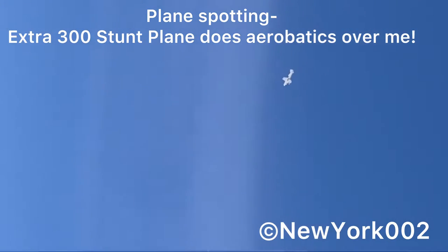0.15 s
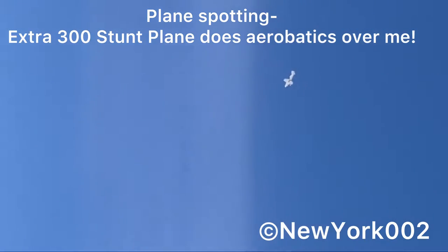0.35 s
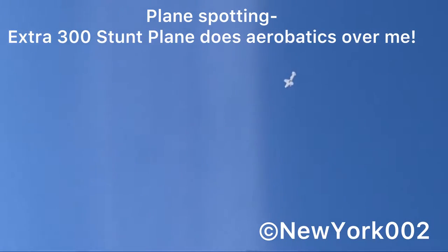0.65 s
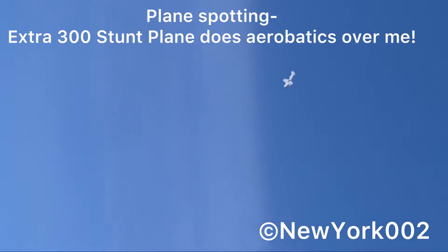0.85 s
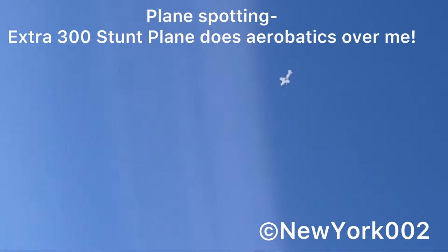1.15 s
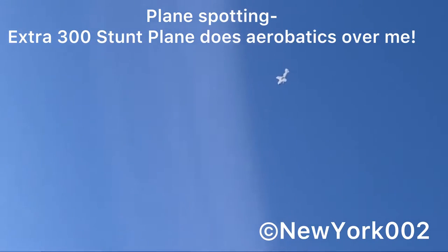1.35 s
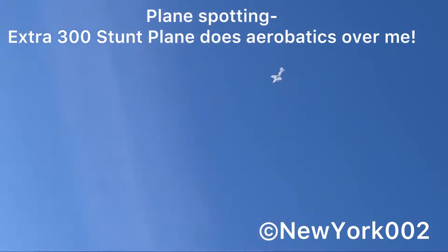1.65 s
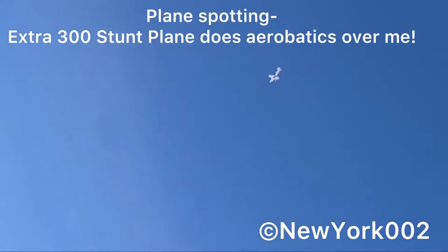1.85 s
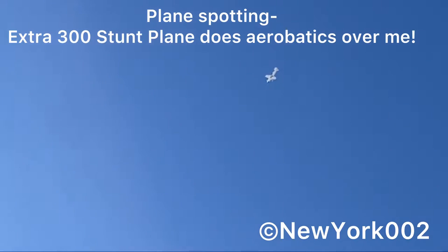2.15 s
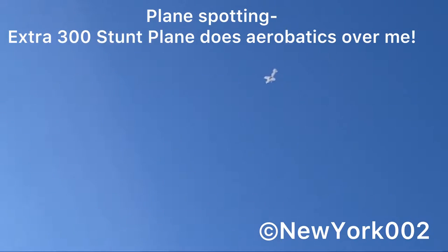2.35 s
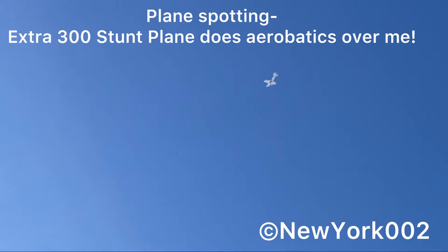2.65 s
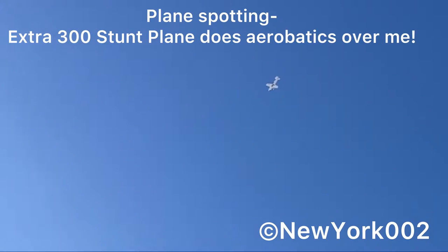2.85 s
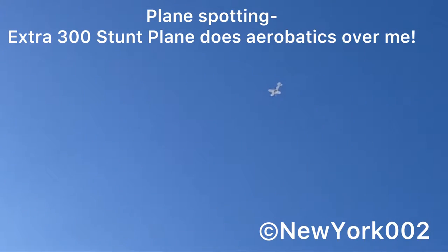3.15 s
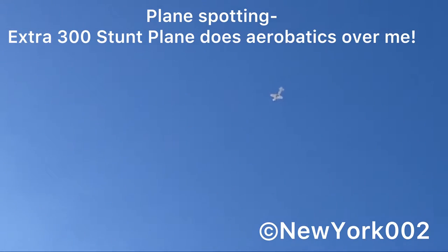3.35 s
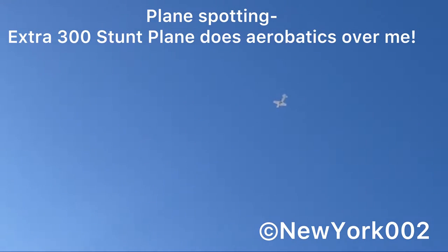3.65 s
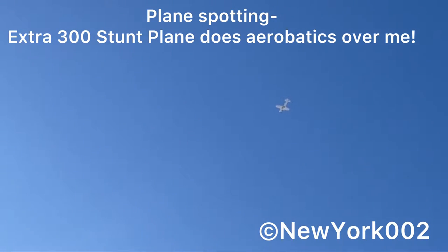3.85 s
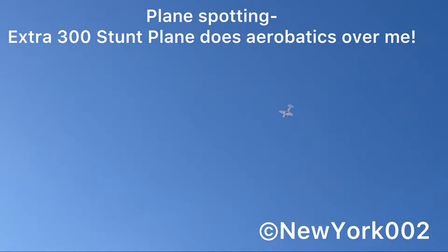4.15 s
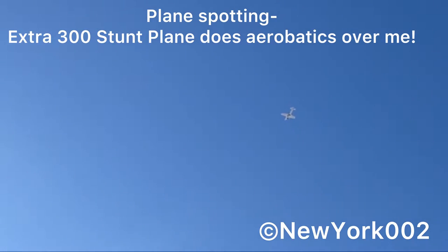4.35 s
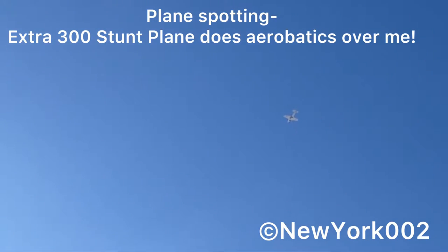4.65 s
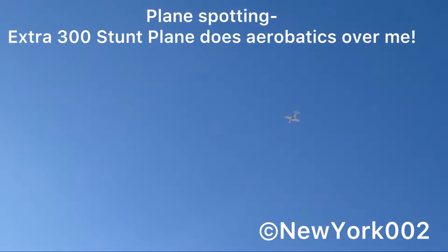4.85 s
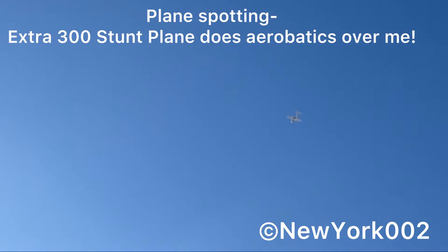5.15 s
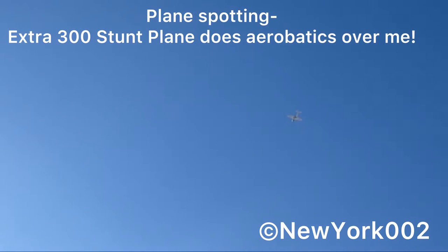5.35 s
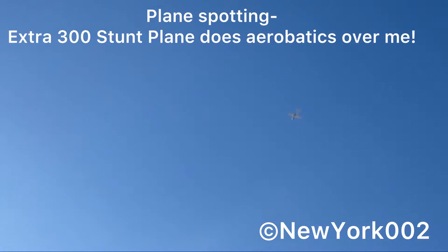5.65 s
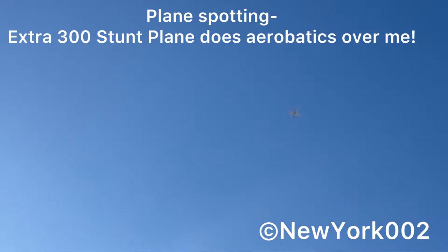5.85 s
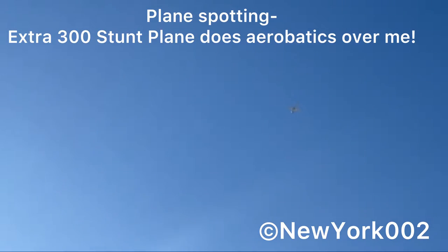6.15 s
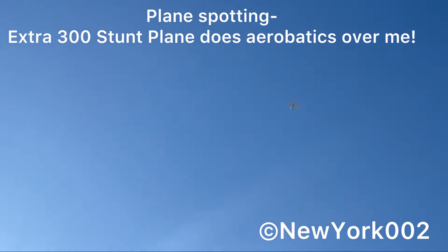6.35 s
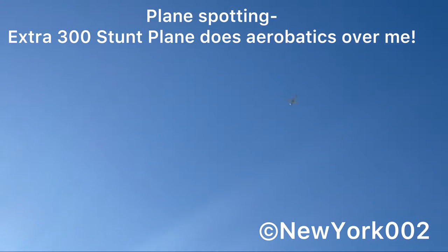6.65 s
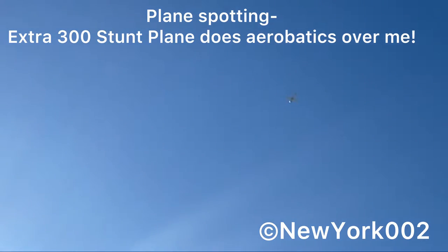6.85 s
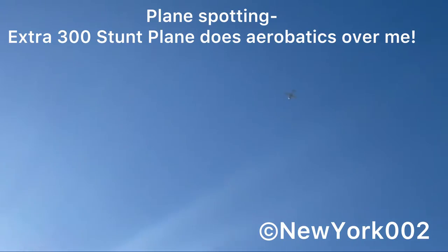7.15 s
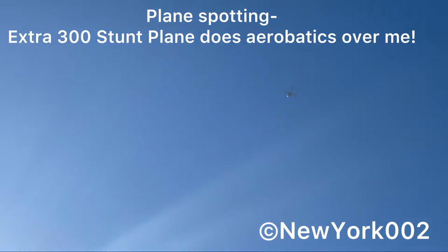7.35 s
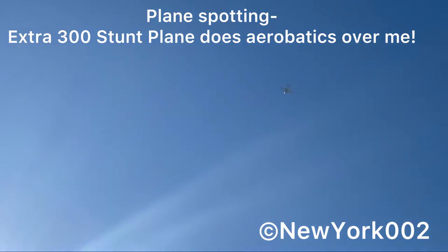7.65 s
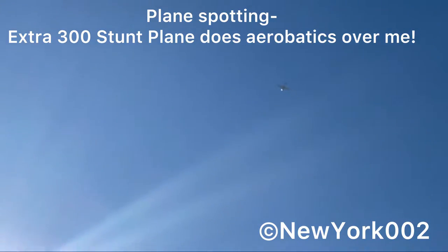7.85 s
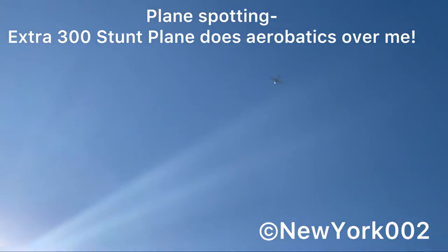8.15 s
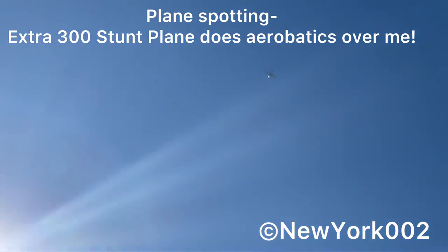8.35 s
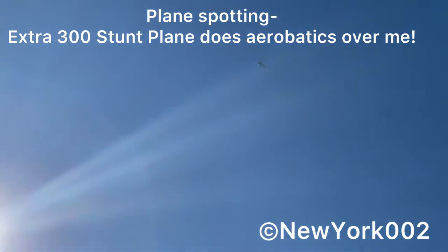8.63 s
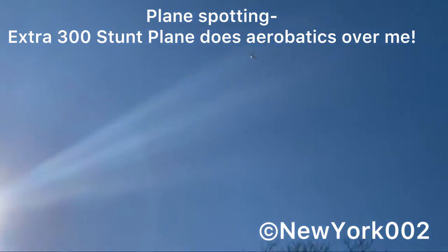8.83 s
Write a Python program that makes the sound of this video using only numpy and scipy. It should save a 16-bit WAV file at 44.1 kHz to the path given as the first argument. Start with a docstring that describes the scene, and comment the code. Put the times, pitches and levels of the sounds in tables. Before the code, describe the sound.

Wind thumps and rumbles on the microphone under the rasping, surging drone of a stunt plane climbing away.

```python
"""A six-cylinder aerobatic plane climbs away high overhead, heard from the ground in the open air.
Its firings make a slowly sinking drone whose harmonics swell and fade in the moving air; the uneven
cylinders lope, and the cracks and puffs of the exhaust come down in rasping surges.
Gusts buffet the stereo microphone, mostly in the first half. Tiny drip-like ticks and one brief
twitter sound over a faint outdoor hiss."""
import sys
import numpy as np
from scipy import signal
from scipy.fft import rfft, irfft, next_fast_len
from scipy.io import wavfile

SR = 44100
rng = np.random.default_rng(int(sys.argv[2]) if len(sys.argv) > 2 else 0)


def int16_out(signal):
    """Quantize to a 16-bit WAV file."""
    q = np.round(np.clip(np.atleast_2d(signal).T, -1, 1) * 32767)
    wavfile.write(sys.argv[1], SR, q.astype(np.int16))


N = 396459
CYLINDERS = 6


def plane(loud_cylinder=5, bark_above_db=8, edge_below_db=11, edge_surge_share=0.95):
    """The plane, far overhead: drone, lope and rasp follow one crankshaft and share the same surges."""
    # Each row: time in seconds, firings per second.
    firing_rate = [(0.0, 117.43), (0.6, 116.84), (1.5, 115.83), (1.8, 115.16), (2.4, 113.71), (3.0, 113.24),
                   (3.3, 112.15), (3.6, 111.89), (4.2, 110.34), (4.79, 109.48), (5.39, 109.47),
                   (5.99, 108.23), (6.59, 106.83), (7.49, 105.32), (7.79, 104.43), (8.39, 104.03),
                   (8.99, 103.37)]
    # Each row: time in seconds, then base levels in dB of the rasp, the bank lines and the cycle lines.
    exhaust_levels = [(0, -59, -46, -56.5), (1.1, -63, -45, -55), (2.5, -55.5, -45, -46.5),
                      (3.5, -55.5, -46, -48), (4.4, -59, -50, -46), (5.3, -55.5, -46, -45.5),
                      (5.9, -60.5, -44.5, -43.5), (6.35, -59.5, -47, -49), (6.75, -62, -45, -44.5),
                      (7.05, -59, -44.5, -43), (7.4, -59, -45.5, -41.5), (8.3, -60.5, -52, -47.5),
                      (8.99, -59, -50.5, -44.5)]
    # Each row: time in seconds, view of the plane (-1 early in the climb, 0 from below, 1 from behind).
    viewpoint = [(1.0, -1), (1.8, -.4), (2.6, -0.21), (3.8, 0.1), (5.2, 0.74), (6.6, 0.94)]
    # Each row: time in seconds, left minus right level in dB.
    pan = [(0, -.3), (1, -1.1), (2.5, -.4), (3.8, -.3), (5, -1.3), (6.6, -1.8), (9, -1.4)]
    firings = np.cumsum(in_time(firing_rate)[0]) / SR - loud_cylinder
    rasp_db, bank_db, cycle_db = in_time(exhaust_levels)
    tail_on, = in_time(viewpoint)
    lift_db, bright_db = surges()
    tones = drone(firings, harmonic_levels(lift_db)) + lope(firings, bank_db, cycle_db, tail_on, lift_db)
    body_db = rasp_db + lift_db
    bark_db = body_db + bark_above_db - bright_db
    edge_db = rasp_db - edge_below_db + edge_surge_share * lift_db + bright_db
    exhaust = rasp(firings, bark_db, body_db, edge_db, crack_db=-5.5 - 0.5 * tail_on)
    return hollow(tones + exhaust) * from_db(in_time(pan)[0] * [[.5], [-.5]])


def drone(firings, levels_db, shimmer_db=0.43, smear_rad=0.07):
    """Exhaust and propeller harmonics line up in one dip per firing; turbulence shakes high ones more."""
    out = 0
    for k, level_db in enumerate(levels_db, 1):
        gain = from_db(level_db + shimmer_db * k * drift(4.1))
        out = out - gain * np.cos(k * (2 * np.pi * firings + smear_rad * drift(4.4)))
    return out


def harmonic_levels(lift_db):
    """The three lowest harmonics fade each in its own way; the next three surge and dull with distance."""
    # Each row of these four: time in seconds, level in dB.
    first = [(0, -58), (.25, -34.5), (.68, -15.5), (2.35, -18.5), (3.05, -16.5), (4.4, -23), (5.08, -16),
             (5.55, -16.5), (6.25, -21), (7.4, -19), (7.7, -21.5), (8.55, -24), (8.99, -25.5)]
    second = [(.3, -36), (.8, -24.5), (1.35, -30.5), (2.6, -27.5), (3.5, -24), (4.399, -28), (5.7, -27),
              (6.9, -38.5), (7.4, -31), (7.8, -39), (8.99, -36)]
    third = [(0, -37.5), (1.301, -35.5), (1.75, -24.5), (2.1, -30), (2.32, -48.5), (2.561, -31.5),
             (2.85, -29), (3.601, -32), (3.899, -38), (4.7, -38.5), (5.1, -31.5), (6.0, -29), (6.33, -37.5),
             (6.701, -33.5), (6.9, -37), (7.1, -25.5), (7.45, -23), (7.748, -30), (8.99, -28.5)]
    upper_base = [(0, -41.5), (2.698, -42), (3.6, -60.5), (5.0, -37), (5.85, -43.5), (6.349, -52),
                  (7.0, -47.5), (7.4, -41), (8.99, -36)]
    # Harmonics 4 to 6. Each row: offset in dB, dB lost per second, share of a surge's lift.
    upper_harmonics = [(-0.5, 0.1, 0.84), (0, 2, 0.47), (-7, 2.3, 0.49)]
    *lows_db, base_db = [in_time(curve)[0] for curve in (first, second, third, upper_base)]
    seconds = np.arange(N) / SR
    uppers_db = [base_db + db - loss * seconds + share * lift_db for db, loss, share in upper_harmonics]
    return lows_db + uppers_db


def lope(firings, bank_db, cycle_db, tail_on, lift_db, surge_share=0.29, shimmer_db=2, centre=20):
    """The two banks differ and one cylinder barks louder; from behind, their lines gather into a throb."""
    # Each row: multiple of the six-firing cycle, then its offset in dB early, from below and from behind.
    lines = [(8, 9, 5, -.5), (9, 5.5, 2, 8.5), (10, 11, -0.5, -7.5), (11, 0, -3, -5.5), (13, 3, -4.5, -7),
             (14, 9, -5, 7), (15, 2.5, 3.5, -1), (16, 3, 0, -4), (17, -1.5, -4.5, -0.5), (19, 3, 0.5, 8.5),
             (20, 7, 0, -1), (21, 4.5, -0.5, 2.5), (22, -2.5, -6.5, -4.5), (23, -4, 10.5, 2.5),
             (25, -8.5, 4.5, 0.5), (26, -4, -2, -8), (27, -7.5, 3.5, -3.5), (28, -1.5, -8.5, -12),
             (29, 0.5, 2, -4.5), (31, -9, -0.5, -6.5), (32, -6, -3.5, -8.5), (33, -18.5, -17, -16),
             (34, -6.5, -10.5, -16.5), (35, -10, -9, -17.5), (37, -12, -9, -12), (38, -15, -11.5, -15),
             (39, -21, -13.5, -12.5), (40, -10, -11.5, -17.5), (41, -8.5, -13, -21.5),
             (42, -16, -12.5, -12.5), (43, -9.5, -13.5, -16.5), (44, -11, -4.5, -18.5),
             (45, -25, -16.5, -23), (46, -14, -13, -22.5), (48, -21, -20, -18), (50, -13.5, -10.5, -14),
             (54, -28.5, -20.5, -20), (56, -17, -16, -20)]
    # How far the lines are out of step. Each row: time in seconds, scale of the scatter in radians.
    phase_scatter = [(0, 2.4), (4.6, 2.4), (5.6, 1.7), (6.1, 1.8), (6.5, 2.2), (7.0, 2.2), (7.4, 2),
                     (8, 1.6), (9, 1.6)]
    out, scatter = 0, in_time(phase_scatter)[0]
    early, behind = np.clip(-tail_on, 0, 1), np.clip(tail_on, 0, 1)
    blur_rad = .13 + .2 * behind   # the air makes the lines wander, the high ones most
    for order, early_db, below_db, behind_db in lines:
        family_db = bank_db if order % (CYLINDERS / 2) == 0 else cycle_db
        angle_db = below_db + (early_db - below_db) * early + (behind_db - below_db) * behind
        air_db = surge_share * order / centre * lift_db + shimmer_db * drift(3)
        sweep = 0.0153 * (order - centre) ** 2   # spreads each throb out in time
        lead = sweep + scatter * rng.uniform(-1.31, 1) + blur_rad * order / centre * drift(5.4)
        phase = 2 * np.pi * order / CYLINDERS * firings + lead
        out = out - from_db(family_db + angle_db + air_db) * np.cos(phase)
    return out


def rasp(firings, bark_db, body_db, edge_db, crack_db, sharpness=0.255, flicker_db=1.16):
    """Each firing lets a sharp crack and a puff of fresh turbulence out of the exhaust."""
    # Low, middle and high bands of the rasp. Each row: frequency in Hz, relative level in dB.
    bark_colour = [(200, -6), (400, 0), (560, 2), (660, -5), (850, -3.5), (1030, -11), (1300, -29)]
    body_colour = [(750, -23), (980, -4.5), (1250, 1), (1600, -1.5), (1780, -19), (2300, -33)]
    edge_colour = [(1400, -22), (1800, 3.5), (2100, 0.5), (2600, -5), (3200, -11.5), (4500, -33.5)]
    puffs = rms_one(np.exp(sharpness * np.cos(2 * np.pi * firings)))
    fronts = from_db(crack_db) * cracks(firings)
    exhaust = fronts + puffs * stereo_noise(side_db=-8.5)
    bark = from_db(bark_db) * coloured(exhaust, bark_colour)
    body = from_db(body_db) * coloured(exhaust, body_colour)
    edge = from_db(edge_db) * coloured(fronts + np.sqrt(puffs) * stereo_noise(side_db=-11), edge_colour)
    return second_path(bark + body + edge) * from_db(flicker_db * drift(6.1))


def cracks(firings, uneven_db=5, jitter_db=1.5, stagger_s=.0004, jitter_s=.00006):
    """One sharp front per firing; each cylinder has its own timing and slowly changing strength."""
    onsets, out = np.flatnonzero(np.diff(np.floor(firings))), np.zeros(N)
    strengths = from_db(uneven_db * np.array([drift(0.99) for _ in range(CYLINDERS)]))
    for cylinder, strength in enumerate(strengths / np.linalg.norm(strengths, axis=0)):
        due = onsets[cylinder::CYLINDERS]
        late_s = stagger_s * rng.standard_normal() + jitter_s * rng.standard_normal(len(due))
        at = np.clip(due + (late_s * SR).astype(int), 0, N - 1)
        out[at] = strength[due] * from_db(jitter_db * rng.standard_normal(len(due)))
    return rms_one(out)


def surges():
    """Moving air lets the engine through to the ground in bell-shaped surges of level and brightness."""
    # Each row: peak time in seconds, half width in seconds, lift in dB, brightness in dB.
    swells = [(.02, 0.085, 8.5, 0.5), (0.329, 0.13, 10, 0), (0.95, 0.19, 10, -1.5), (1.245, 0.11, 10, 2.5),
              (1.601, 0.16, 6, 4), (1.931, 0.18, 7.5, -2), (2.358, 0.18, 6, -1.5), (2.661, 0.15, 6.5, -2),
              (3.06, 0.15, 8, -2.5), (3.24, 0.077, 6, 2), (3.55, 0.13, 3, -2.5), (3.75, 0.088, 5, 0.5),
              (4.03, 0.14, 2, -1.5), (4.87, 0.072, 4, -2.5), (5.15, 0.1, 0, -8), (5.391, 0.18, 5.5, 2.5),
              (5.72, 0.11, 15.5, 1), (6.05, 0.2, 10.5, 0.5), (6.21, 0.073, 2, 5), (6.78, 0.1, 4, 0),
              (7.41, 0.22, 6, -4), (7.455, 0.098, 6, -2.5), (7.58, 0.079, 2, 7), (7.76, 0.13, 2.5, -3.5)]
    seconds, lift_db, bright_db = np.arange(N) / SR, 0, 0
    for s, width_s, peak_db, tilt_db in swells:
        bell = np.exp(-np.minimum(((seconds - s) / width_s) ** 2, 20))
        lift_db, bright_db = lift_db + peak_db * bell, bright_db + tilt_db * bell
    return lift_db, bright_db


def second_path(x, lag_s=0.001286, strength=0.35):
    """Moving air bends part of the sound along a longer path; the wandering lag makes it phasey."""
    late = np.arange(N) - SR * lag_s * np.exp(.3 * drift(1.5))
    echo = np.array([np.interp(late, np.arange(N), channel) for channel in x])
    return (x + strength * echo) / np.hypot(1, strength)


def hollow(x, half_width_octaves=0.36):
    """Two paths through the air cancel at the microphone: a broad notch glides through the drone."""
    # Each row: time in seconds, centre in Hz, depth in dB (negative lifts).
    notch = [(6.15, 700, -1), (6.4, 593, 3), (6.6, 448, -1.5), (6.8, 268, 0), (6.95, 340, 5.5),
             (7.06, 475, 8), (7.2, 640, 5.5), (7.32, 780, -0.5)]
    hz, seconds, frames = signal.stft(x, SR, nperseg=2048)
    s, notch_hz, depth_db = np.transpose(notch)
    away = np.log2((hz[:, None] + 1) / np.interp(seconds, s, notch_hz)) / half_width_octaves
    gain = from_db(-np.interp(seconds, s, depth_db) * np.exp(-away ** 2))
    return signal.istft(frames * gain, SR)[1][:, :N]


def wind(rumble_db=1, flutter_db=-4):
    """Wind right on the microphone: a deep rumble and a brighter flutter both follow the gusts."""
    # Each row of both: frequency in Hz, relative level in dB.
    rumble_colour = [(15, -44), (28, -25.5), (42, -12.5), (60, -6), (90, -2.5), (130, -8), (200, -28.5),
                     (400, -37), (1000, -53)]
    flutter_colour = [(60, -18), (120, 13.5), (200, -3.5), (300, -1), (500, -6.5), (900, -35.5),
                      (2000, -51)]
    gust_db = gust_level()
    rumble = from_db(gust_db + rumble_db) * coloured(stereo_noise(side_db=-18.5), rumble_colour)
    flutter = from_db(gust_db + flutter_db) * coloured(stereo_noise(side_db=-6), flutter_colour)
    return rumble + flutter


def gust_level(attack_s=0.078):
    """Gusts rise and die away over a slackening breeze; their powers add to one level in dB."""
    # Each row: time in seconds, level in dB.
    breeze = [(0, -33), (1.2, -38.5), (3.5, -42), (3.95, -44), (8.99, -44)]
    # Each row: peak time in seconds, peak level in dB, release in seconds.
    gusts = [(0.047, -15, 0.042), (.125, -21, 0.09), (0.171, -23, 0.018), (.69, -30.5, 0.095),
             (0.931, -30, 0.069), (1.85, -34.5, .08), (2.06, -29, 0.22), (2.68, -20.5, 0.066),
             (3.091, -23.5, 0.1), (3.21, -28, 0.043), (3.35, -28.5, 0.29), (3.831, -34, 0.042),
             (4.12, -31, 0.21), (4.44, -27.5, 0.13), (4.661, -27, 0.1)]
    seconds, power = np.arange(N) / SR, from_db(in_time(breeze)[0]) ** 2
    for s, peak_db, release_s in gusts:
        fall = np.maximum((s - seconds) / attack_s, (seconds - s) / release_s)
        power = power + (from_db(peak_db) * np.exp(-np.minimum(fall, 20))) ** 2
    return 10 * np.log10(power)


def buffets(swell_s=0.0023, trim_db=-6):
    """Single eddies thump the microphone, each pushing and pulling for a cycle or two."""
    # Each row: start in seconds, level in dB before the trim, frequency in Hz.
    eddies = [(0.01, 0, 120), (0.048, -4.5, 105), (0.09, 0.5, 89), (0.119, -5, 122), (0.147, 2, 112),
              (0.171, 2.5, 150), (0.685, -7, 116), (1.822, -15, 105), (2.078, -6.5, 75), (2.145, -10.5, 55),
              (2.636, -3, 141), (2.694, -2, 208), (2.719, 2.5, 84), (3.064, -5, 80.7), (3.092, -0.5, 67),
              (3.16, -3.5, 110), (3.196, -2, 70), (3.245, -5, 85), (3.391, -14, 85), (4.386, -12, 85),
              (4.443, -7, 83.5), (4.534, -9, 107), (4.598, -13, 105), (4.692, -19, 91.5)]
    out = np.zeros(N)
    for (s, db, hz), phase in zip(eddies, rng.random(len(eddies))):
        at = int(s * SR)
        t = np.arange(min(SR // 10, N - at)) / SR
        swell = (t / swell_s * np.exp(1 - t / swell_s)) ** 2
        out[at:at + len(t)] += from_db(db + trim_db) * swell * np.sin(2 * np.pi * (hz * t + phase))
    return out


def ticks(click_count=110):
    """Small sounds around the microphone: drip-like ticks, many faint dry clicks and one high twitter."""
    # Each row of both: time in seconds, pitch in Hz, level in dB before the trim.
    clear_ticks = [(.44, 4400, -66), (.672, 4960, -65), (0.686, 3800, -61.5), (0.893, 4480, -58.5),
                   (1.24, 5280, -66), (1.661, 3240, -61), (1.747, 3270, -62), (1.822, 4130, -63),
                   (2.015, 3800, -63), (2.347, 3730, -61.5), (2.792, 3880, -67), (2.967, 4470, -64),
                   (3.082, 3230, -58), (3.474, 3620, -61), (3.584, 5600, -62), (3.943, 5170, -65),
                   (4.41, 5200, -66), (4.509, 6300, -67), (4.563, 5600, -67), (5.038, 4100, -58.5),
                   (5.182, 5400, -65), (5.405, 3670, -59), (5.622, 4300, -63.5), (5.963, 5100, -61.5),
                   (6.397, 5400, -69), (6.452, 5000, -60.5), (6.638, 4470, -62), (6.655, 3820, -65),
                   (7.118, 3500, -64), (7.509, 3020, -61), (7.578, 3400, -66.5), (8.302, 6000, -68),
                   (8.365, 4900, -65), (8.813, 5200, -62)]
    twitter_notes = [(1.027, 6250, -45), (1.037, 6200, -47), (1.044, 7230, -41), (1.061, 6000, -45)]
    faint_clicks = [(.1 + 8.8 * when, 3200 * 2 ** (.9 * pitch), -68.5 + 7.5 * size)
                    for when, pitch, size in rng.random((click_count, 3))]
    drips = chirps(clear_ticks, swell_s=0.0006, rise=0.032, trim_db=13.5, rough=.25)
    clicks = chirps(faint_clicks, swell_s=0.00018, rise=0, trim_db=11.5, rough=.25)
    twitter = chirps(twitter_notes, swell_s=0.0013, rise=0.076, trim_db=-7.5, rough=.17)
    return drips + clicks + twitter


def chirps(rows, swell_s, rise, trim_db, rough):
    """Tiny rings of uneven length swell and die; rise glides their pitch up and rough unsteadies it."""
    out = np.zeros(N)
    for (s, hz, db), stretch in zip(rows, np.exp(rng.uniform(-0.4, 1, len(rows)))):
        at = int((s - swell_s) * SR)
        age = np.arange(min(SR // 20, N - at)) / SR / (swell_s * stretch)
        jitter = rough * rng.standard_normal(SR // 20)[:len(age)]
        pitch_hz = hz * (1 + rise * np.tanh(age / 2 - .5) + jitter)
        swell = from_db(db + trim_db) * age * np.exp(1 - age)
        out[at:at + len(age)] += swell * np.sin(2 * np.pi * np.cumsum(pitch_hz) / SR)
    return out


def air(trim_db=10):
    """The faint, even hiss of the open air behind everything."""
    # Each row: frequency in Hz, relative level in dB.
    hiss_colour = [(40, 5), (150, 7.5), (400, 23), (700, 17), (1200, -1), (2000, 5.5), (3500, 2.5),
                   (5200, 1), (7000, -3.5), (8500, -8), (10500, -7), (12500, -11), (15500, -14.5)]
    # Each row: time in seconds, level in dB before the trim.
    hiss_level = [(0.0, -63.5), (5.06, -67), (5.57, -67.5), (7.26, -67.5), (8.33, -67.5), (8.9, -69)]
    return from_db(in_time(hiss_level)[0] + trim_db) * coloured(stereo_noise(side_db=-30.5), hiss_colour)


def from_db(db):
    """Decibels to gain."""
    return np.exp(np.asarray(db) * np.log(10) / 20)


def rms_one(x):
    """Scale to unit power."""
    return x / np.sqrt(np.mean(x ** 2) + 1e-20)


def in_time(rows):
    """Each column after the time column, at every sample."""
    s, *columns = np.transpose(rows)
    return [np.interp(np.arange(N) / SR, s, column) for column in columns]


def drift(rate_hz):
    """A smooth random wander of spread 1 that changes about rate_hz times a second."""
    pole = np.exp(-200 * np.pi * rate_hz / SR)   # one step per 100 samples
    steps = rng.standard_normal(N // 100 + 1002)
    slow = signal.lfilter([1], [1, -2 * pole, pole * pole], steps)[1000:]
    return np.interp(np.arange(N) / 100, np.arange(len(slow)), rms_one(slow))


def coloured(x, spectrum):
    """Shape a steady sound by a spectrum that falls 20 dB an octave beyond its ends; unit power."""
    size = next_fast_len(N)
    hz, db = np.transpose(spectrum)
    octave, points = np.log2(np.arange(size // 2 + 1) * SR / size + 1), np.log2(hz)
    beyond = np.abs(octave - np.clip(octave, points[0], points[-1]))
    gain = from_db(np.interp(octave, points, db) - 20 * beyond)
    return rms_one(irfft(rfft(x, size) * gain, size)[..., :N])


def stereo_noise(side_db):
    """White noise, mostly common to both channels."""
    mid, side = rng.standard_normal((2, N))
    return mid + from_db(side_db) * side * [[1], [-1]]


def scene(fade_s=.006):
    """Plane high above, wind at the microphone, small sounds around; a soft start and end."""
    from_end = np.minimum(np.arange(N), np.arange(N)[::-1])
    fade = np.sin(np.pi / 2 * np.minimum(from_end / (fade_s * SR), 1)) ** 2
    return (plane() + wind() + buffets() + ticks() + air()) * fade


def record(dry, low_cut_hz=37, high_cut_hz=15700):
    """The stereo microphone sheds the deepest rumble and the very top; its sides differ in treble phase."""
    # Each row: frequency in Hz, turns of phase by which the left lags the right.
    left_lag = [(0, 0), (6100, 0), (7300, .25), (8200, .5), (9300, .68), (10700, 1), (12800, 1),
                (14200, 1.5)]
    size = next_fast_len(N + 2000)
    lag = np.interp(np.arange(size // 2 + 1) * SR / size, *np.transpose(left_lag))
    pair = irfft(rfft(dry, size) * np.exp(1j * np.pi * lag * [[-1], [1]]), size)[:, :N]
    pair = signal.sosfilt(signal.butter(3, low_cut_hz, "high", fs=SR, output="sos"), pair)
    return signal.sosfilt(signal.ellip(10, .2, 80, high_cut_hz, fs=SR, output="sos"), pair)


dry = scene()
out = record(dry)
int16_out(out)
```